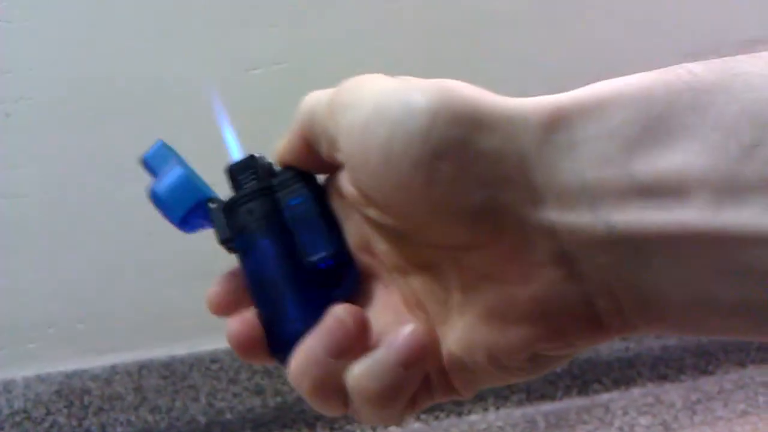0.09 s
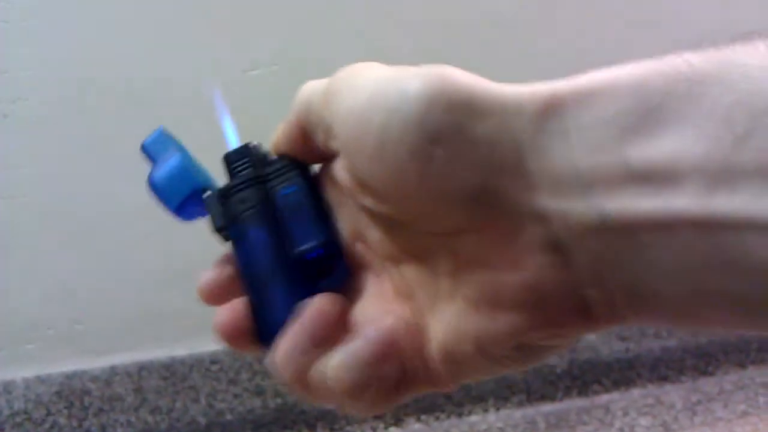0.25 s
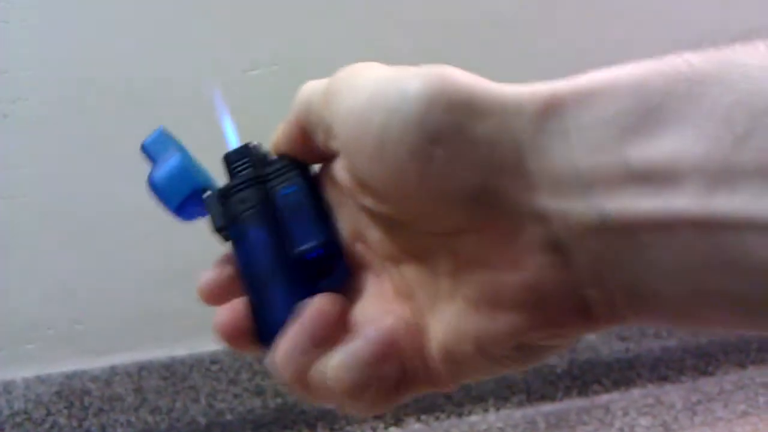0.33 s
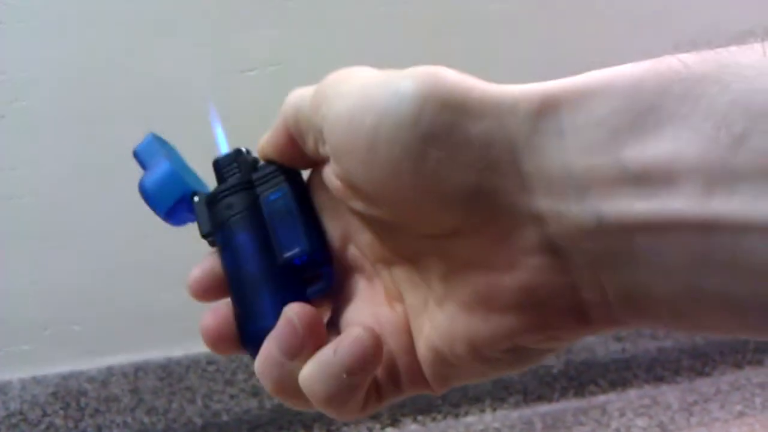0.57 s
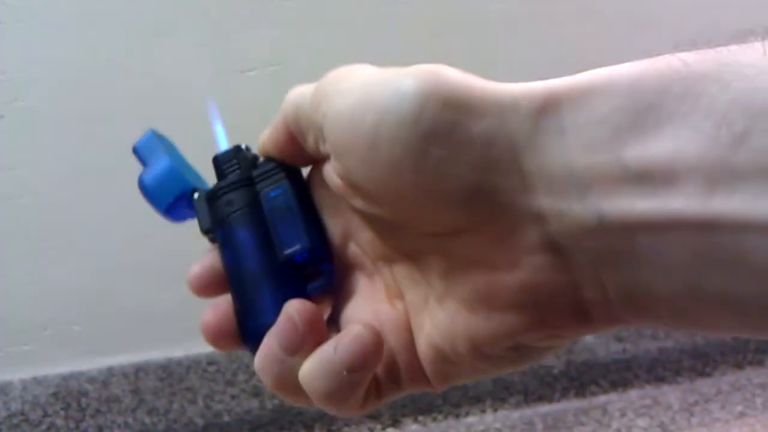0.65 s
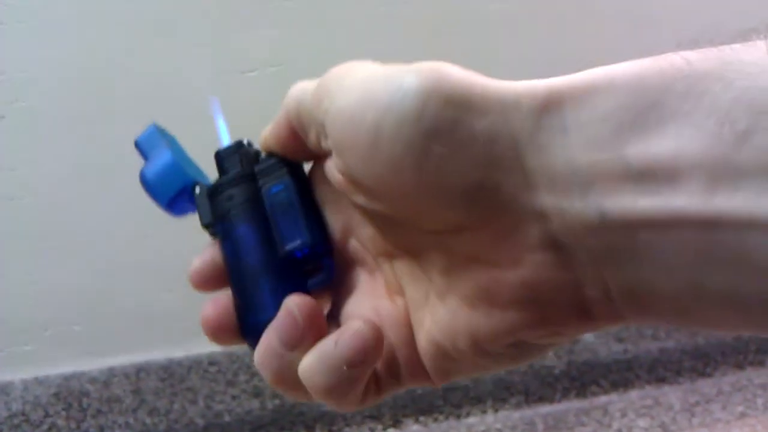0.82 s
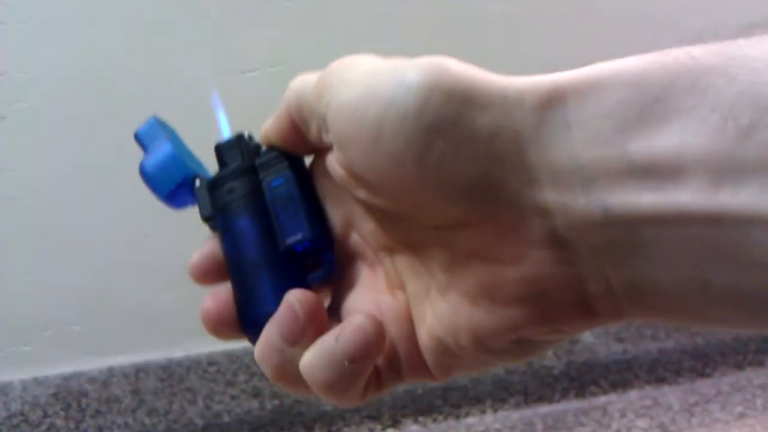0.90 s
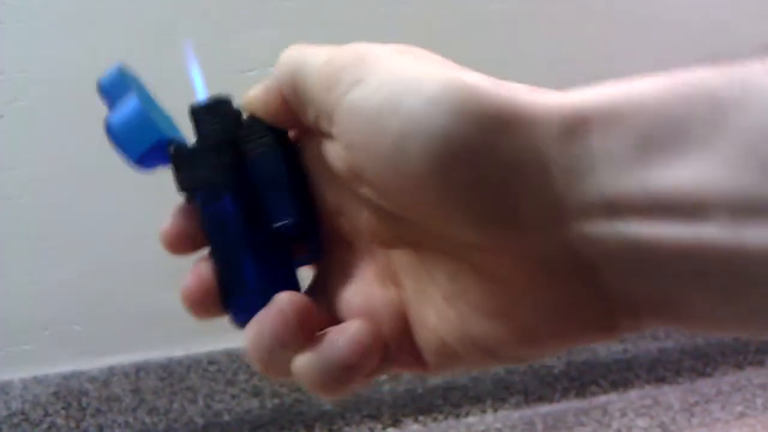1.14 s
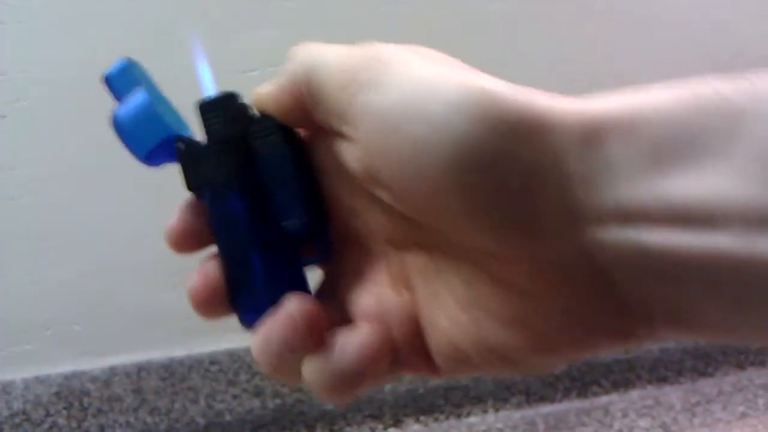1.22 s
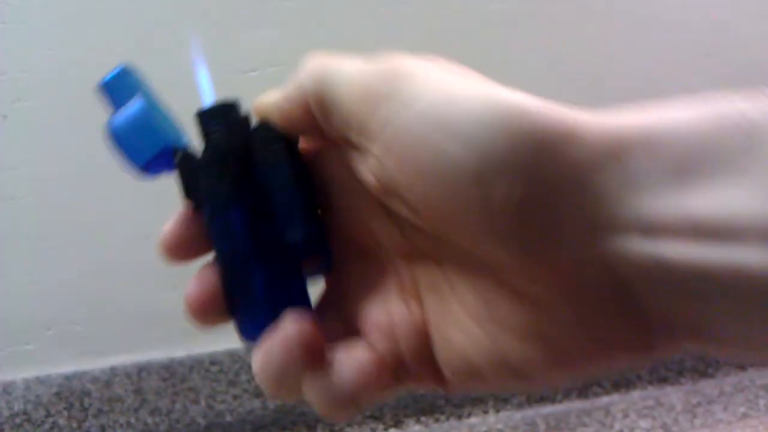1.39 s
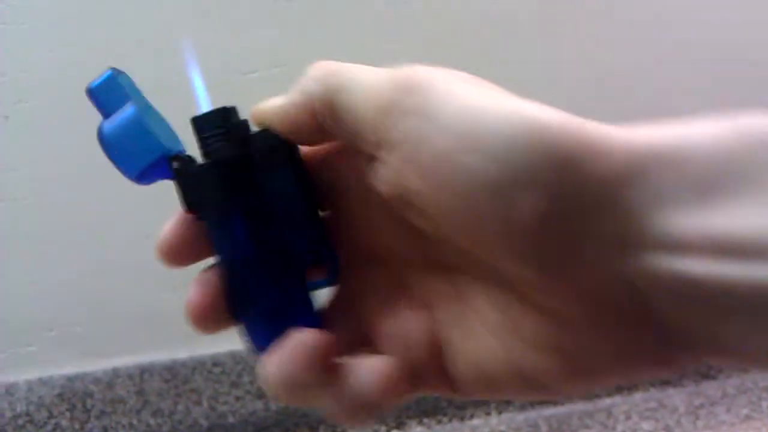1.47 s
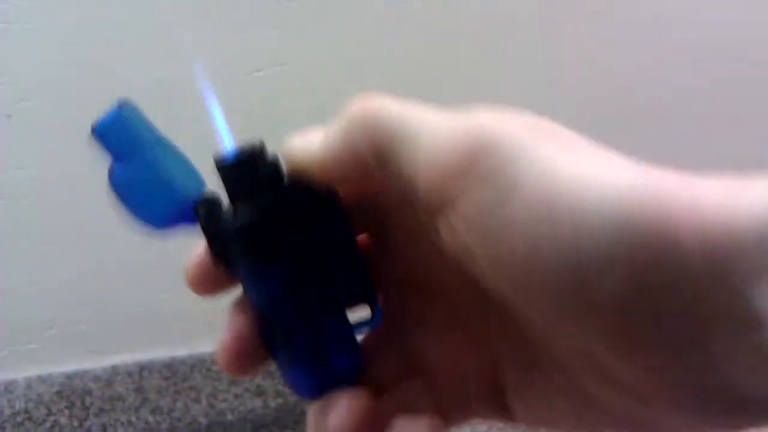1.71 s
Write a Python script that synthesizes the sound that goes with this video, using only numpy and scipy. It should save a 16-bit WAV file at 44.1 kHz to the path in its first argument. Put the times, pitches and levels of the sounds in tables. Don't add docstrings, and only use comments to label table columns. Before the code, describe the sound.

A torch lighter clicks with a sharp snap and burns with a soft hissing jet flame

```python
import sys
import numpy as np
from scipy import signal
from scipy.fft import rfft, irfft
from scipy.io import wavfile
from scipy.ndimage import uniform_filter1d

SR = 44100
rng = np.random.default_rng(int(sys.argv[2]) if len(sys.argv) > 2 else 0)


def log_audio(samples):
    frames = np.atleast_2d(samples).T
    limited = np.clip(frames, -1, 1)
    pcm = np.round(limited * 32767).astype(np.int16)
    wavfile.write(sys.argv[1], SR, pcm)


def gain_from_db(level_db):
    decades = np.asarray(level_db, float) / 20
    return 10 ** decades


N = 77175
STRIKE_S = .20935


def evened(x):
    return x / np.sqrt(np.mean(x ** 2) + 1e-20)


def read(points, hz):
    f, value = np.transpose(points)
    return np.interp(np.log(hz + 1), np.log(f + 1), value)


def add(mix, s, sound):
    part = mix[round(s * SR):][:len(sound)]
    part += sound[:len(part)]


def air():
    # f/Hz, density/dB
    air_colour = [(25, -16), (60, -9.5), (130, -3), (200, -15.5), (320, -12), (1900, -17.5), (4000, -12.5),
                  (9000, -39.5)]
    level_db = -58
    gain = gain_from_db(read(air_colour, np.fft.rfftfreq(N, 1 / SR)))
    white = rfft(rng.standard_normal(N))
    return gain_from_db(level_db) * evened(irfft(white * gain, N))


def turbulence(colour, patchy_db, flicker_db):
    frames, hz = N // 128 + 5, np.fft.rfftfreq(512, 1 / SR)
    real, imag, patches = rng.standard_normal((frames, 257, 3)).T
    patches = uniform_filter1d(patches, size=5, axis=0)
    patches = evened(uniform_filter1d(patches, size=16, axis=1))
    flicker = evened(uniform_filter1d(rng.standard_normal(frames), size=3))
    level_db = read(colour, hz)[:, None] + patchy_db * patches + flicker_db * flicker
    z = (real + 1j * imag) * gain_from_db(level_db)
    return evened(signal.istft(z, nperseg=512, noverlap=384)[1][:N])


def tube_hum():
    centre_hz, width_hz = 623.4, 10
    off = (np.fft.rfftfreq(N, 1 / SR) - centre_hz) / width_hz
    return evened(irfft(rfft(rng.standard_normal(N)) / (1 + off ** 2), N))


def jet():
    # t/s, hiss level/dB, roar level/dB
    gas_flow = [(0, -60, -69), (0.036, -51.5, -70), (.2, -51.5, -81), (.24, -48, -54.5), (.6, -49, -55),
                (0.899, -52, -54.5), (.93, -55.5, -57), (1.1, -58, -54), (1.4, -56.5, -54),
                (1.46, -56.5, -52.5), (1.66, -55, -52.5), (1.75, -50.5, -50.5)]
    # f/Hz, density/dB
    hiss_colour = [(1500, -16), (3000, -11.5), (4000, -0.5), (5000, 2), (5700, 5), (6600, 1), (7600, -6),
                   (8600, -18.5)]
    # f/Hz, density/dB
    roar_colour = [(200, -9), (350, -3.5), (620, 0), (1000, 2), (1500, 0), (2000, -1), (2600, -5),
                   (5000, -38)]
    # t/s, peak level/dB, f/Hz
    spits = [
        (1.4328, -34, 1700),
    ]
    tube_db = -13.5
    s, hiss_db, roar_db = np.transpose(gas_flow)
    t = np.arange(N) / SR
    hiss = turbulence(hiss_colour, patchy_db=1.2, flicker_db=.9)
    roar = turbulence(roar_colour, patchy_db=0, flicker_db=.4) + gain_from_db(tube_db) * tube_hum()
    out = gain_from_db(np.interp(t, s, hiss_db)) * hiss + gain_from_db(np.interp(t, s, roar_db)) * roar
    u = np.arange(-88, 88) / SR
    for at, db, hz in spits:
        packet = np.cos(2 * np.pi * hz * u - .6) * np.exp(-(2.2 * hz * u) ** 2)
        add(out, at + u[0], gain_from_db(db) * packet)
    return out


def snap():
    # t/s, peak level/dB, f/Hz, length/s
    blows = [
        (.2103, -7.5, 5700, .0006),
        (.2112, -6, 6900, .0004),
        (.2122, -2.5, 5050, .0009),
        (.2143, -12, 4850, .0011),
        (.2161, -11, 5600, .0004),
        (.2172, -18, 5200, .0009),
    ]
    # f/Hz, level/dB, t60/s
    shell_modes = [(680, -12.5, 0.025), (1560, -10.5, 0.0131), (2220, -9, 0.025), (3057, -4.5, 0.022),
                   (3890, 0.5, 0.01), (4404, 1, 0.02), (6990, 0, 0.0071), (7160, -27, 0.028)]
    ring_db, thump_db, thump_s = -16, -7, .0001
    creep_db, creep_db_per_s = -29, 2600
    crack_db, crack_t60_s = -16, .029
    out, t = np.zeros(N), np.arange(2000) / SR
    ring = sum(gain_from_db(db - 60 * t / t60) * np.sin(2 * np.pi * hz * t) for hz, db, t60 in shell_modes)
    push = (1 - t / thump_s / 2) * t / thump_s * np.exp(1 - t / thump_s)
    add(out, STRIKE_S, -gain_from_db(ring_db) * ring - gain_from_db(thump_db) * push)
    u = np.arange(-200, 200) / SR
    for s, db, hz, length_s in blows:
        add(out, s + u[0], gain_from_db(db) * np.cos(2 * np.pi * hz * u) * np.exp(-(u / length_s) ** 4))
    lead_s = STRIKE_S - np.arange(N) / SR
    rattle = signal.oaconvolve(rng.standard_normal(N), np.diff(push) + .13 * ring[1:])[:N]
    swell_db = creep_db - creep_db_per_s * lead_s
    decay_db = crack_db + 60 * lead_s / crack_t60_s
    return out + gain_from_db(np.where(lead_s > 0, swell_db, decay_db)) * evened(rattle)


def room():
    # f/Hz, t60/s
    ring_time = [(500, 0.12), (1500, .45), (2200, 1), (3500, 1), (4750, 0.91), (5400, .8), (6500, 0.64),
                 (8500, 0.62)]
    # f/Hz, level/dB
    wall_colour = [(1500, -27.5), (2200, -16), (3700, -13.5), (4450, -3.5), (5200, -1.5), (6000, -4),
                   (6800, -4.5), (8700, -23)]
    level_db, delay_s, rise_s = 16, .003, .014
    tap_spread_db, tap_gap = 3, 11
    ridge_hz, ridge_width_hz, ridge_db = 4740, 90, 9
    taps = np.zeros(N)
    at = np.arange(0, N - 22, tap_gap)
    jitter, sign, size = rng.random((len(at), 3)).T
    at = at + (tap_gap * jitter).astype(int)
    taps[at] = np.sign(sign - .5) * gain_from_db(-tap_spread_db * np.log(size + 1e-3))
    hz, t, z = signal.stft(taps, SR, nperseg=512)
    colour_db = read(wall_colour, hz) + ridge_db * np.exp(-((hz - ridge_hz) / ridge_width_hz) ** 2)
    decay_db = 60 * t / read(ring_time, hz)[:, None]
    tail = signal.istft(z * gain_from_db(colour_db[:, None] - decay_db), SR, nperseg=512)[1]
    tail = tail * np.clip((np.arange(len(tail)) / SR - delay_s) / rise_s, 0, 1)
    out = np.zeros(N)
    add(out, STRIKE_S, gain_from_db(level_db) * tail / np.linalg.norm(tail))
    return out


def scene():
    return (snap() + room() + jet() + air())[None]


def low_pass(x, hz):
    return signal.oaconvolve(x, signal.firwin(401, hz, window=("kaiser", 10), fs=SR), "same")


def thin(x):
    # f/Hz, share of local level
    line_share = [(1200, .3), (1900, 1.0), (2500, 1.75), (4000, 1.8), (4800, 1.1), (5800, 1.5),
                  (7000, 1.65), (8500, 1.7)]
    block, grid, band, spread_db = 2822, 2150, 28, 2.6
    spared_s = (.15, .26)
    n, k = np.arange(2 * block) + .5, np.arange(round(block * .42)) + .5
    window = np.sqrt(2 / block) * np.sin(np.pi * n / block / 2)
    basis = window * np.cos(np.pi / block * np.outer(k, n + block / 2))
    lead = 2 * block - grid
    padded = np.pad(x, (lead, 2 * block))
    starts = np.arange(0, len(padded) - 2 * block + 1, block)
    lines = padded[starts[:, None] + np.arange(2 * block)] @ basis.T
    local = np.sqrt(abs(uniform_filter1d(lines ** 2, size=60, axis=1)) + 1e-20)
    bands = rng.standard_normal((len(lines), len(k) // band + 1))
    wander_db = spread_db * np.repeat(bands, band, axis=1)[:, :len(k)]
    limit = read(line_share, k * SR / block / 2) * local * gain_from_db(wander_db)
    kept = lines * (abs(lines) > limit)
    left = np.sqrt(abs(uniform_filter1d(kept ** 2, size=60, axis=1)) + 1e-20)
    kept = kept * np.minimum(local / left, 1.5)
    middle_s = (starts + block - lead) / SR
    active = (middle_s < spared_s[0]) | (middle_s > spared_s[1])
    change = ((kept - lines) * active[:, None]) @ basis
    out = padded.copy()
    for at, part in zip(starts, change):
        add(out, at / SR, part)
    return out[lead:lead + N]


def drop_bands(x):
    # start/s, end/s, low f/Hz, high f/Hz
    lost_bands = [
        (.148, .164, 0, 250),
        (.148, .197, 250, 3700),
        (.174, .197, 3700, 4400),
        (.2195, .2305, 0, 3800),
    ]
    hz, t, z = signal.stft(x, SR, nperseg=256, noverlap=224)
    for start_s, end_s, lo_hz, hi_hz in lost_bands:
        z = z * (1 - np.outer((hz >= lo_hz) & (hz <= hi_hz), (t > start_s) & (t < end_s)))
    return signal.istft(z, SR, nperseg=256, noverlap=224)[1][:N]


def band_limit(x):
    return signal.sosfilt(signal.butter(12, 16810, fs=SR, output="sos"), x)


def record(dry):
    edge_hz, top_hz, clip, floor_db = 8700, 16000, .73, -101
    x = low_pass(drop_bands(thin(dry[0])), edge_hz)
    x = low_pass(np.clip(x, -clip, clip), top_hz)
    mix = x + gain_from_db(floor_db) * rng.standard_normal(N)
    return band_limit(mix)


dry = scene()
out = record(dry)
log_audio(out)
```